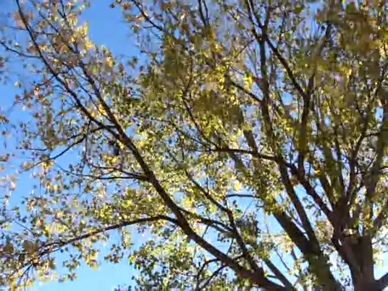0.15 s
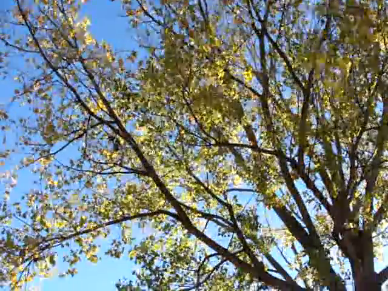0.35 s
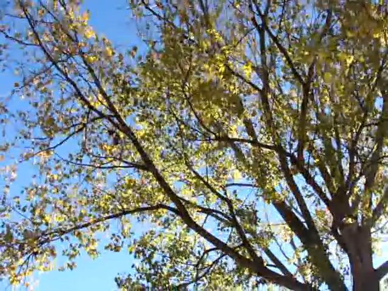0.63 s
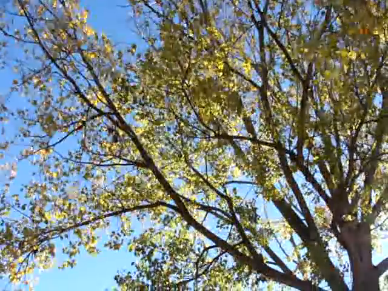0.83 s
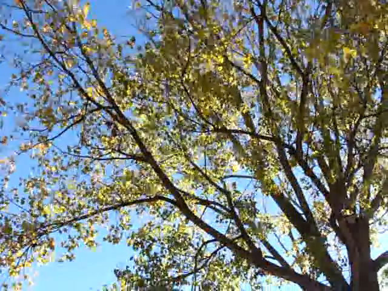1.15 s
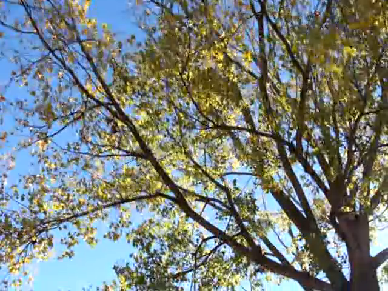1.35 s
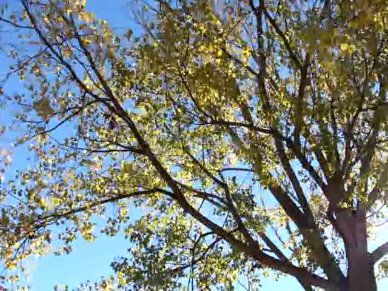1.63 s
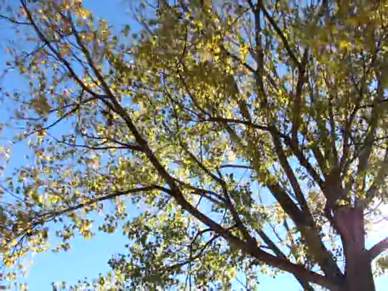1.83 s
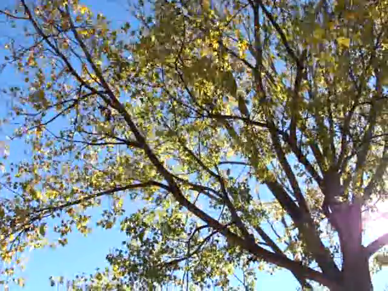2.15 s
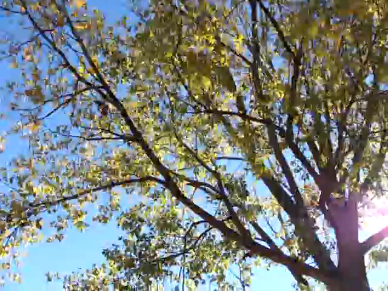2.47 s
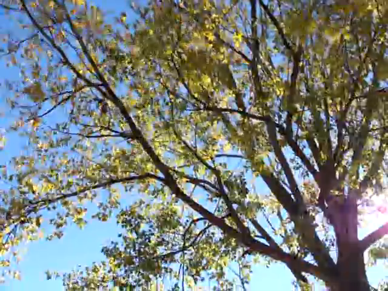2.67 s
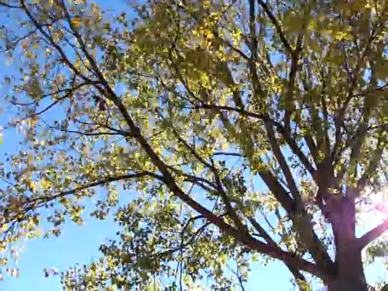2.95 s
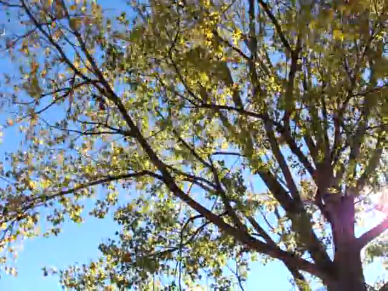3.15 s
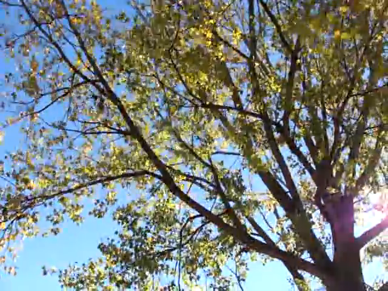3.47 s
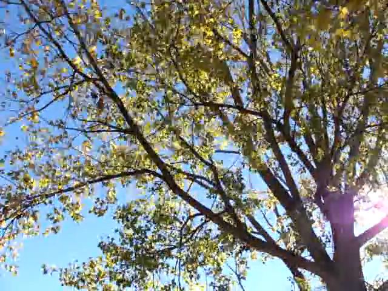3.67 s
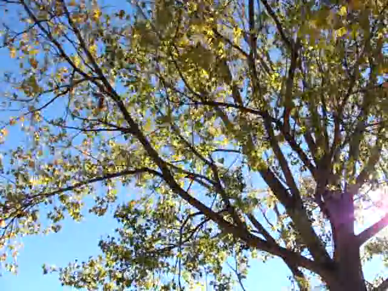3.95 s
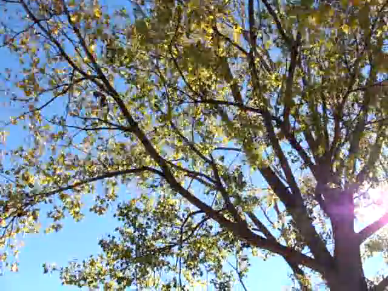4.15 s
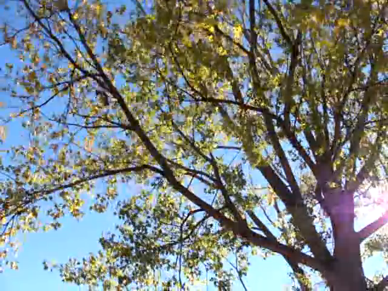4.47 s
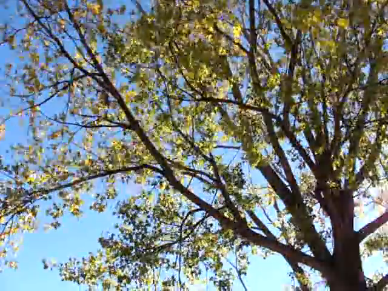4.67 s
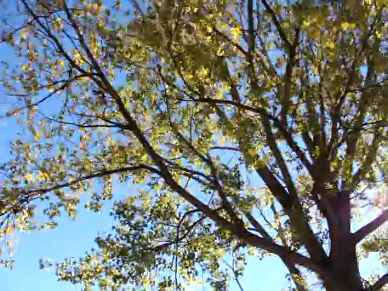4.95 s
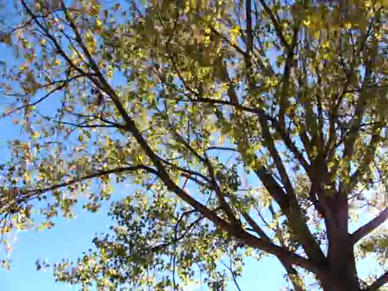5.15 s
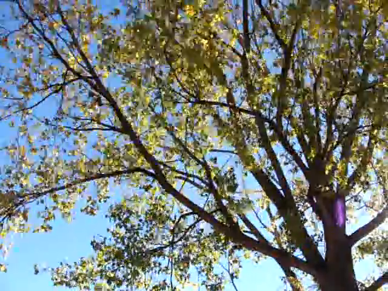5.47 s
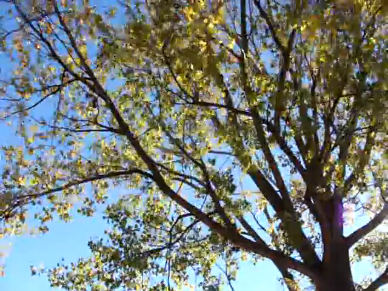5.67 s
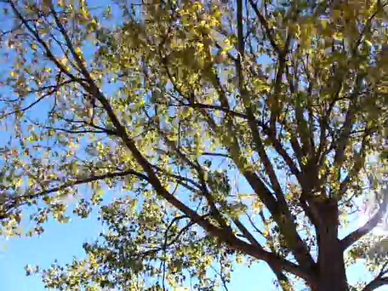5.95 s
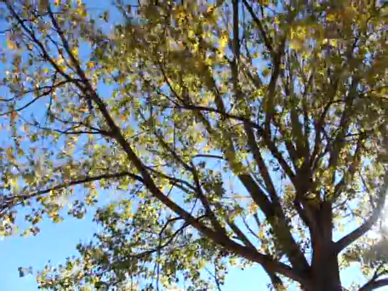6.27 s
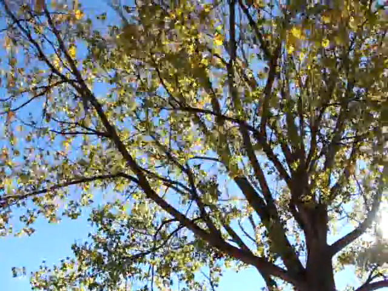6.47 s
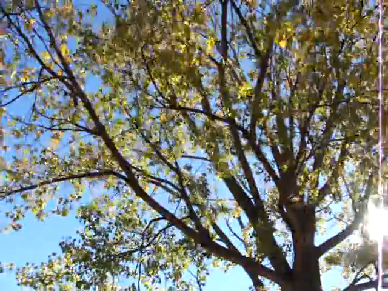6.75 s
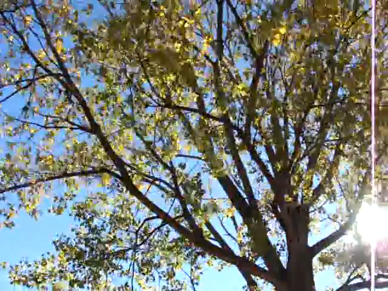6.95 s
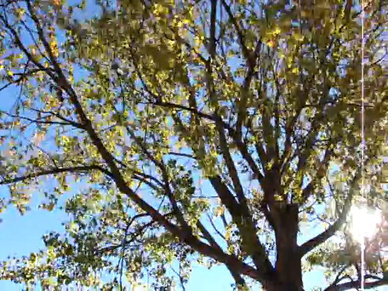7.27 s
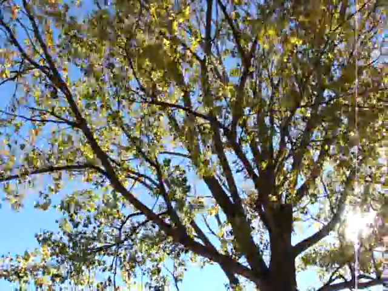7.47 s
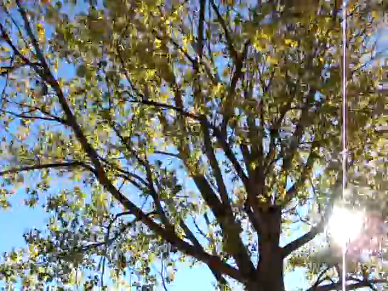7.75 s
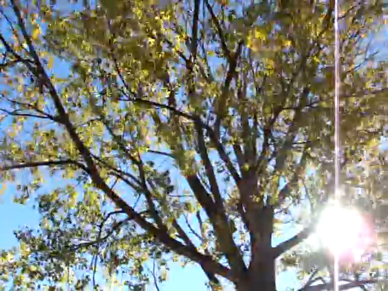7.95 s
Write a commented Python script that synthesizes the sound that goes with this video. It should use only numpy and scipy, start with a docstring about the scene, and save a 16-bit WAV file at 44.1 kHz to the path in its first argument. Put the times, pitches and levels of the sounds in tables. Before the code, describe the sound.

Dry tree leaves rustle in a rising wind, with occasional low rumbles and soft thumps of air on the microphone.

```python
"""Dry leaves rustle in the crown of an autumn tree: countless brushes and ticks, louder and brighter
as the wind rises. Far trees and open air hum underneath. Now and then the breeze reaches the single
microphone, where it rumbles, and its strongest eddies land as soft low thumps."""
import sys
import numpy as np
from scipy import signal
from scipy.fft import rfft, irfft, next_fast_len
from scipy.io import wavfile
from scipy.ndimage import uniform_filter1d, map_coordinates

SR = 44100
rng = np.random.default_rng(int(sys.argv[2]) if len(sys.argv) > 2 else 0)


def waveform_to_disk(signal):
    """Save audio, clipped to [-1, 1], as 16-bit WAV at the path in sys.argv[1]."""
    frames = np.transpose(np.atleast_2d(signal))
    scaled = np.clip(frames, -1, 1) * 32767
    samples = np.round(scaled).astype(np.int16)
    wavfile.write(sys.argv[1], SR, samples)


N = 357651


def amp(db):
    """Decibels to gain."""
    return 10 ** (np.asarray(db) / 20)


def unit_rms(x):
    """x at rms 1."""
    return x / np.sqrt(np.mean(x ** 2) + 1e-20)


def curve(rows):
    """(seconds, value) rows as one value per sample."""
    return np.interp(np.arange(N) / SR, *np.transpose(rows))


def wobble(knots_per_s):
    """Smooth random curve."""
    knots = rng.standard_normal(int(N * knots_per_s / SR) + 4)
    return map_coordinates(knots, [np.arange(N) * knots_per_s / SR])


def filtered(x, response):
    """x through a gain given as a function of Hz."""
    size = next_fast_len(N + 8192)
    return irfft(rfft(x, size) * response(np.fft.rfftfreq(size, 1 / SR)), size)[..., :N]


def coloured(x, spectrum):
    """x shaped by (Hz, dB) points on a log axis, at rms 1."""
    points_hz, points_db = np.transpose(spectrum)
    return unit_rms(filtered(x, lambda hz: amp(np.interp(np.log(hz + 1), np.log(points_hz), points_db))))


def patchy_noise(spectrum, patchy_db):
    """Noise of rms 1 with patches of random gain in time and frequency."""
    bins = signal.stft(rng.standard_normal(N), nperseg=512)[2]
    patches = uniform_filter1d(rng.standard_normal(bins.shape), size=16, axis=0)
    patches = uniform_filter1d(patches, size=12, axis=1)
    noise = signal.istft(bins * amp(patchy_db * unit_rms(patches)), nperseg=512)[1][:N]
    return coloured(noise, spectrum)


def leaf_contacts(per_s, spread_db, scrape_s):
    """Leaves touch at random moments; each touch is a tiny scrape of its own strength."""
    touches = rng.random(N) < per_s / SR
    strength = amp(spread_db * np.clip(rng.standard_normal(N), -2, 2))
    t = np.arange(SR // 20) / SR
    power = signal.fftconvolve(touches * strength ** 2, np.exp(-t / scrape_s))[:N]
    return np.sqrt(np.abs(power)) * rng.standard_normal(N)


# Wind in the crown builds in steps, then holds. Each row: time in seconds, rustle level in dB.
CROWN_LEVELS = [(0, -43.5), (1.28, -40.5), (1.44, -39.5), (1.85, -39.8), (4.1, -36.5), (5.3, -33.5),
                (8.1, -33.7)]
# Leaf hiss and leaf ticks. Each row: frequency in Hz, relative density in dB.
HISS_SPECTRUM = [(100, -25.5), (400, -7), (800, -7), (1100, -6), (1600, -6), (2000, -3.5), (2500, -0.16),
                 (3500, 0), (4300, -3), (5500, -5.5), (7000, -10), (9000, -13.5), (10000, -20.5)]
TICK_SPECTRUM = [(500, -32.5), (1500, -9), (2600, 4.5), (4200, 0.5), (7000, -17.5), (10000, -14)]


def leaves():
    """The whole crown merges into a hiss; the nearest leaves tick, more often in stronger wind."""
    rustle_db = curve(CROWN_LEVELS)
    swell_db = rustle_db - rustle_db.max()
    hiss = patchy_noise(HISS_SPECTRUM, patchy_db=0.5)
    density = amp(0.6 * swell_db)
    contacts = leaf_contacts(per_s=520 * density, spread_db=4.0, scrape_s=0.0017)
    ticks = coloured(contacts / np.sqrt(density), TICK_SPECTRUM)
    crown = hiss + amp(-9.5) * ticks
    # Stronger wind: harder contacts, more treble.
    treble = filtered(crown, lambda hz: hz ** 4 / (hz ** 4 + 5800 ** 4))
    flicker_db = 0.42 * wobble(25) + wobble(110)
    treble_gain = amp(0.06 * swell_db + 2.05 + flicker_db)
    return amp(rustle_db) * (crown + (treble_gain - 1) * treble)


# Distant wash. Each row: frequency in Hz, relative density in dB.
FAR_AIR_SPECTRUM = [(20, -18), (60, -10.5), (140, -8), (230, -2.5), (430, -2), (610, 1.8), (790, -2.5),
                    (1250, -2), (1700, -4.5), (3000, -12), (10000, -28.5)]


def far_air(level_db=-45.0):
    """The steady, dull wash of distant trees and open air."""
    return amp(level_db) * patchy_noise(FAR_AIR_SPECTRUM, patchy_db=0.67)


# Draught, almost still until one long gust. Each row: time in seconds, rumble level in dB.
DRAUGHT_LEVELS = [(0, -54), (1.5, -66), (2.6, -67), (3.6, -57.5), (4.62, -49.5), (4.9, -38), (5.85, -35.5),
                  (6.7, -40), (7.35, -49), (8.1, -45)]
# Short puffs on top of it. Each row: start in seconds, hold in seconds, rumble level in dB.
AIR_PUFFS = [(0.111, 0.033, -43.5), (.2, .02, -47.5), (.575, 0.075, -38), (.79, 0.15, -47),
             (1.02, .13, -40), (2.7, 0.089, -57), (3.0, .05, -47), (3.195, 0.017, -38), (3.27, .045, -35),
             (3.39, 0.015, -41), (4.717, 0.046, -33), (6.28, .11, -36.5), (6.66, .05, -39),
             (6.8, .025, -39.5), (7.02, 0.11, -39), (7.572, .03, -39), (7.68, .03, -42.5),
             (7.96, 0.074, -43)]


def breeze_db(attack_s=0.014, release_s=0.023, wake_hold_s=0.01, wake_offset_db=-19.5):
    """Air at the microphone: the draught plus puffs and eddy wakes that rise, hold and die away."""
    t = np.arange(N) / SR
    power = amp(curve(DRAUGHT_LEVELS)) ** 2
    wakes = [(time_s, wake_hold_s, db + wake_offset_db) for time_s, db, _ in STRONG_EDDIES]
    for start_s, hold_s, db in list(AIR_PUFFS) + wakes:
        fade = np.maximum(start_s - t, 0) / attack_s + np.maximum(t - start_s - hold_s, 0) / release_s
        power += (amp(db) * np.exp(-np.minimum(fade, 20))) ** 2
    return 10 * np.log10(power)


# Large and small eddies. Each row: frequency in Hz, relative density in dB.
RUMBLE_SPECTRUM = [(15, -25.5), (30, -9), (50, -1.5), (75, -1), (115, -1), (160, -7), (250, -17),
                   (400, -27.5), (800, -50)]
FLUTTER_SPECTRUM = [(50, -27), (130, -0.5), (230, 0), (310, -2.5), (400, -12), (520, -11.5), (900, -31),
                    (2000, -72)]


def buffeting():
    """Turbulence on the microphone: faster air is louder and sheds smaller, higher eddies."""
    rumble_db = breeze_db()
    lumps = unit_rms(amp(1.5 * wobble(45)))
    rumble = coloured(rng.standard_normal(N), RUMBLE_SPECTRUM)
    flutter = coloured(rng.standard_normal(N), FLUTTER_SPECTRUM)
    flutter_gain = amp(0.2 * rumble_db + 2.5)
    return amp(rumble_db) * lumps * (rumble + flutter_gain * flutter) / np.sqrt(1 + flutter_gain ** 2)


# Eddies hitting the microphone. Each row: centre in seconds, relative level in dB, nominal pitch in Hz.
STRONG_EDDIES = [(0.118, -31, 205), (0.13, -40, 179), (0.609, -32, 171), (0.625, -28, 283),
                 (0.81, -28.5, 132), (1.111, -26, 165), (1.132, -29.5, 213), (1.154, -34, 199),
                 (3.209, -23, 185), (3.27, -30, 135), (3.287, -32, 188), (3.316, -29.5, 169),
                 (4.733, -26, 229), (4.751, -25, 299), (4.897, -25.5, 181), (4.912, -20, 177),
                 (5.025, -23.5, 180), (5.197, -13.5, 223), (5.207, -17, 216), (5.254, -20.5, 242),
                 (5.267, -12.5, 246), (5.31, -14, 180), (5.354, -25, 209), (5.387, -22, 178),
                 (5.471, -22, 165), (5.735, -21, 383), (5.745, -15, 407), (5.765, -14.5, 304),
                 (5.829, -24, 141), (5.88, -13, 220), (5.993, -19, 204), (6.083, -21, 146),
                 (6.137, -24, 200), (6.366, -27.5, 191)]


def thumps(width_cycles=0.46, pitch_scatter=0.039, whirl_gain=0.21, trim_db=-0.5):
    """Each strong eddy is a short pressure swing that swells and dies; smaller whirls ride on it."""
    out = np.zeros(N + SR)
    t = np.arange(-SR // 20, SR // 20) / SR
    for centre_s, db, hz in STRONG_EDDIES:
        swing_phase, detune, whirl_phase = rng.uniform(-0.78, 1, 3)
        cycles = hz * (1 + pitch_scatter * detune) * t
        swing = np.cos(np.pi * (2 * cycles + swing_phase)) * np.exp(-0.5 * (cycles / width_cycles) ** 2)
        whirl = np.cos(np.pi * (2 * 2.08 * cycles + whirl_phase)) * np.exp(-0.5 * (cycles / 0.5) ** 2)
        start = round((centre_s + t[0]) * SR)
        out[start:start + len(t)] += amp(db + trim_db) * (swing + whirl_gain * whirl)
    return out[:N]


def scene():
    """One microphone feeds both channels."""
    mono = leaves() + far_air() + buffeting() + thumps()
    return np.array([mono, mono])


def record(dry, cutoff_hz=10140):
    """Brick-wall low-pass."""
    return filtered(dry, lambda hz: hz < cutoff_hz)


dry = scene()
out = record(dry)
waveform_to_disk(out)
```